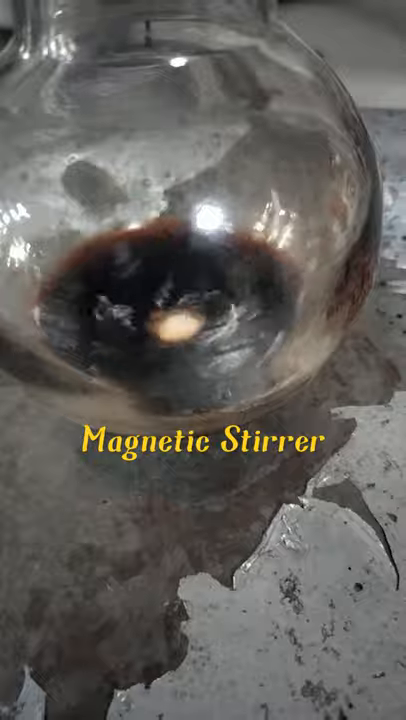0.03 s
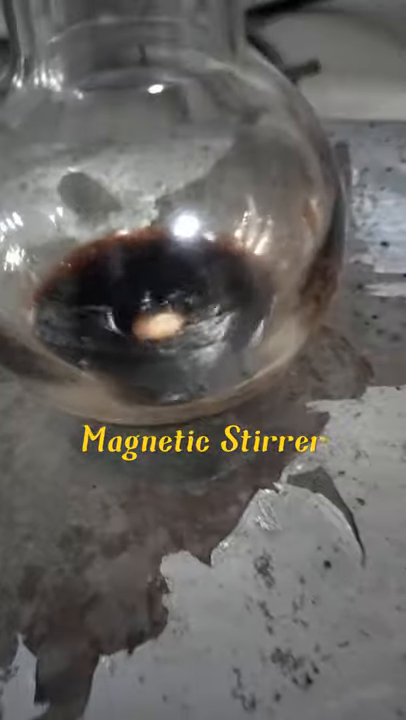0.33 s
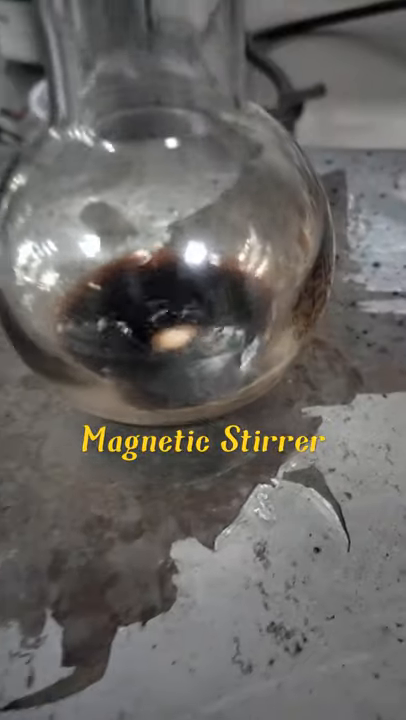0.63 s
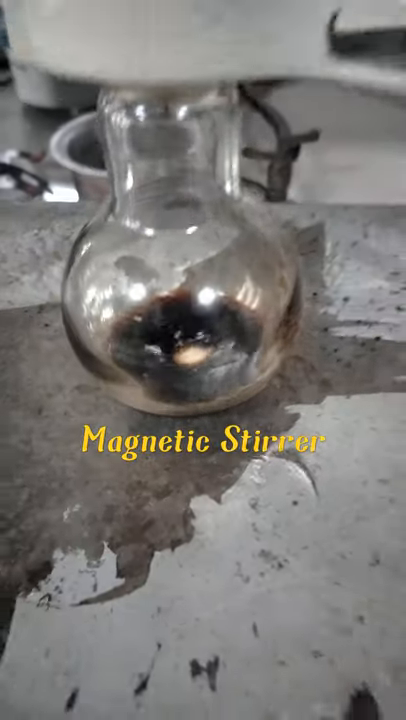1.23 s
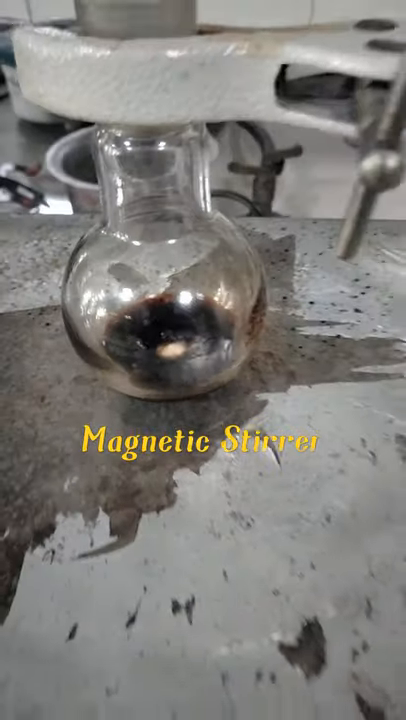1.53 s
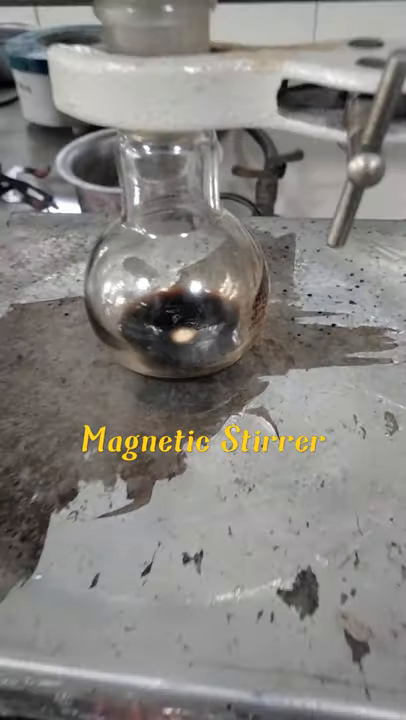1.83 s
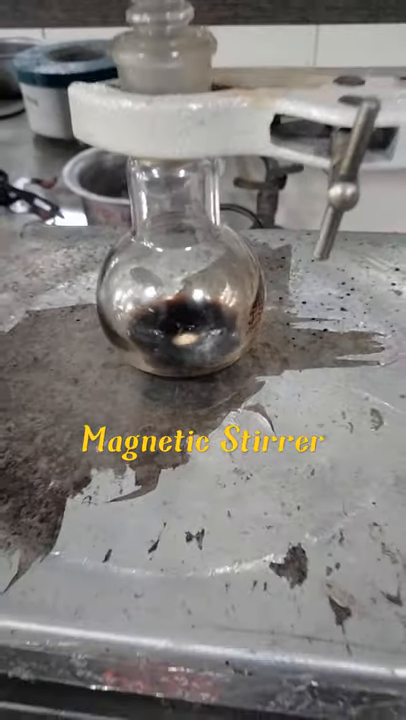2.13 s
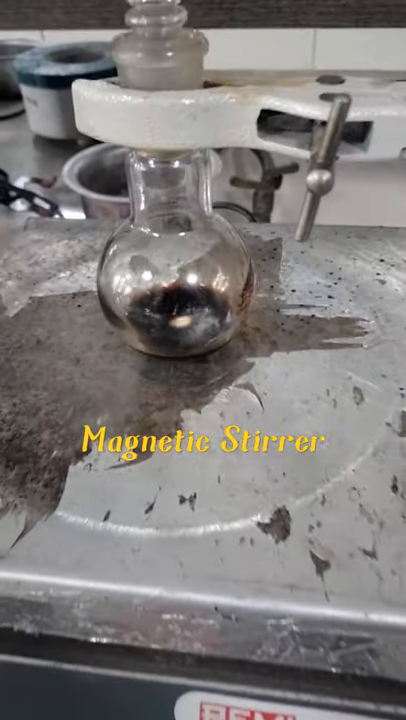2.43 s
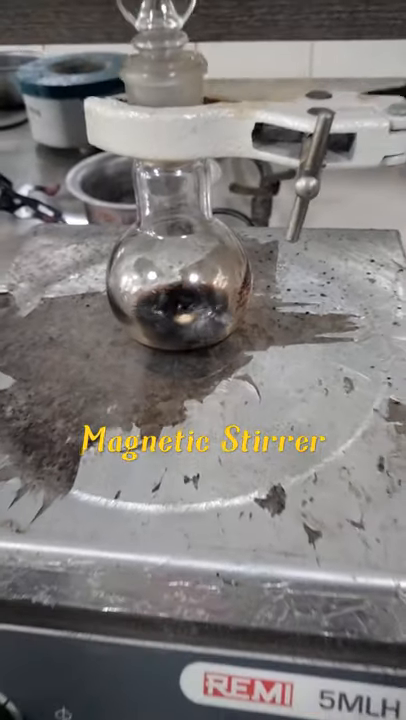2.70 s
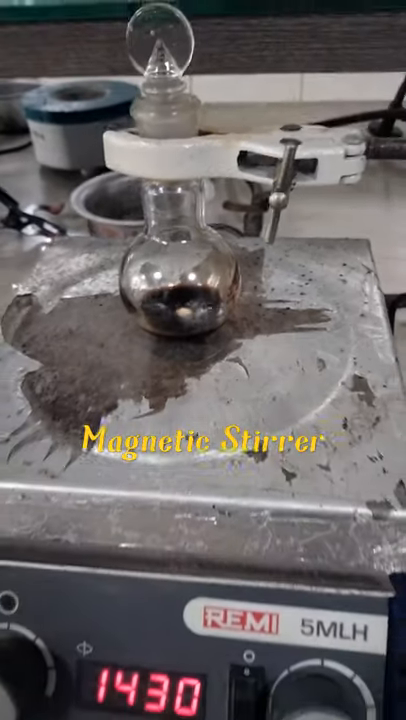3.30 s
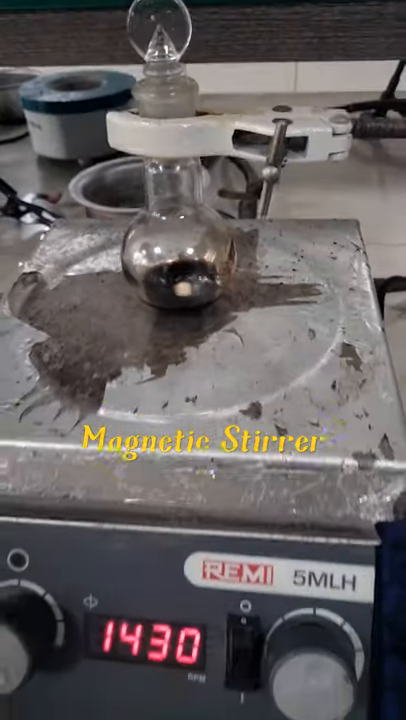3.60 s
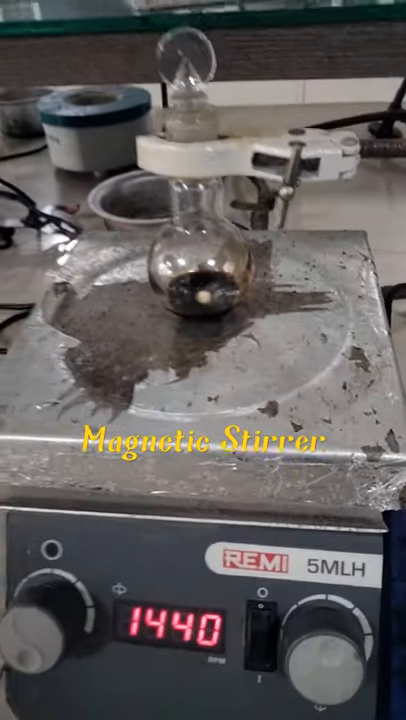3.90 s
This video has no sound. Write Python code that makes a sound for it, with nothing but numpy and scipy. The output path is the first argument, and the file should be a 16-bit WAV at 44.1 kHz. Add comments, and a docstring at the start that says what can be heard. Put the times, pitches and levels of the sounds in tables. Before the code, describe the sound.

A magnetic stirrer hums while its stir bar ticks and rattles in a glass flask.

```python
"""A laboratory bench, where a magnetic stirrer runs as the microphone slowly draws back.
Machines and moving air hum in the room. The stirrer's pulsed motor drive whines and hisses,
swaying with each turn. The wobbling stir bar knocks on the glass flask twice a turn and
rings its liquid-damped modes. The sound fades in at the start."""
import sys
import numpy as np
from scipy import signal
from scipy.fft import rfft, irfft
from scipy.io import wavfile

SR = 44100
rng = np.random.default_rng(int(sys.argv[2]) if len(sys.argv) > 2 else 0)


def output_pcm(signal):
    """Save a mono or channel-first signal as 16-bit PCM at the path in sys.argv[1].

    Samples are clipped to [-1, 1] before scaling.
    """
    pcm = np.clip(np.atleast_2d(signal).T, -1, 1) * 32767
    wavfile.write(sys.argv[1], SR, np.round(pcm).astype(np.int16))


N = 174195
T = np.arange(N) / SR
TURN_HZ, DRIVE_HZ = 23.925, 427.55  # motor turns, drive pulses


def amp(db):
    """Decibels to gain."""
    return 10 ** (np.asarray(db) / 20)


def unit(x):
    """Scales to rms 1."""
    return x / np.sqrt(np.mean(abs(x) ** 2) + 1e-20)


def level(points):
    """Gain envelope through (t/s, level/dB) points."""
    return amp(np.interp(T, *np.transpose(points)))


def colour(x, points):
    """EQs x through (f/Hz, level/dB) points, then scales to rms 1."""
    hz, db = np.transpose(points)
    f = np.fft.rfftfreq(N, 1 / SR)
    return unit(irfft(rfft(x) * amp(np.interp(np.log(f + 1), np.log(hz), db)), N))


def band(centre_hz, width_hz):
    """Noise in one resonance, at rms 1."""
    f = np.fft.rfftfreq(N, 1 / SR)
    return unit(irfft(rfft(rng.standard_normal(N)) / (1 + ((f - centre_hz) / (width_hz / 2)) ** 2), N))


def tone(hz, waver):
    """A sine of rms 1 whose level and phase wander slowly, by a waver of 0 to 1."""
    coarse_t = np.linspace(0, T[-1], 400)
    drift_hz, phase = 2 * rng.standard_normal(24), rng.random(24)
    drift = unit(np.exp(2j * np.pi * (np.outer(coarse_t, drift_hz) + phase)).sum(1))
    wander = unit(np.sqrt(1 - waver ** 2) + waver * np.interp(T, coarse_t, drift))
    return np.sqrt(2) * (wander * np.exp(2j * np.pi * (hz * T + rng.random()))).real


# Motor and mains tones: f/Hz, level/dB, waver/0-1
HUM_TONES = [(53.3, -70.5, 0.7), (83.14, -54, 0), (101, -62, 0.7), (121.2, -76, 0), (127.5, -77.5, 1),
             (165.3, -55.5, 0.29), (195.2, -66, 0.55), (204.9, -62, 0.3), (252, -71.5, 0.16),
             (279.8, -70.5, 0.72), (288.2, -65.5, 0.8), (299.2, -65, 0.18), (307, -70, 0.85),
             (366, -72, 0.8), (407.3, -68, 0.05), (490.6, -69, 1), (498, -70, 0.73), (630.6, -70.5, 1),
             (1202, -75, 0.5), (1473, -78.5, 0.8)]
# Fader ride on the hum: t/s, level/dB
HUM_RIDE = [(.1, -0.5), (.35, 0.5), (.9, 2), (1.3, 2), (2.2, 0), (3.1, 2), (3.95, 0.5)]


def hum():
    """Motors and mains lay down a bed of low, wavering tones."""
    return level(HUM_RIDE) * sum(amp(db) * tone(hz, waver) for hz, db, waver in HUM_TONES)


# Whine partials: multiple of the pulse rate, level/dB
WHINE_PARTIALS = [(1, -73.5), (2, -65.5), (4, -77), (8, -82), (12, -82), (16, -79.5), (20, -87), (21, -85)]
# Upper sidebands the turning motor splits off the third partial: offset/turn rates, level/dB
HOUSING_SIDEBANDS = [(1, -18), (2, -19.5)]
# Ride on the third partial, which the housing amplifies: t/s, level/dB
HOUSING_RIDE = [(.25, -53), (.8, -54.5), (1.4, -56), (2.1, -59.5), (3, -60.5), (3.95, -67)]
# EQ of the pulsed hiss: f/Hz, level/dB
HISS_EQ = [(1500, -9), (2300, 6.5), (3000, -7), (4600, -16), (6100, -8.5), (6850, -7), (7400, -12),
           (8500, 1.5), (9600, -4), (10500, -22), (12000, -9), (12750, -27), (13500, -7), (14400, -17),
           (15500, -2.5)]


def drive(sway_depth=0.14, waver=0.067, rustle_db=-6, hiss_db=-63.5, decay_periods=0.42):
    """The drive's pulses whine and hiss; the housing rings along and each motor turn sways it all."""
    sway = 1 + sway_depth * (np.cos(2 * np.pi * TURN_HZ * T) + np.sin(4 * np.pi * TURN_HZ * T)) / 2
    whine = sum(amp(db) * tone(k * DRIVE_HZ, waver) for k, db in WHINE_PARTIALS)
    third = tone(3 * DRIVE_HZ, waver)
    third += sum(amp(db) * tone(3 * DRIVE_HZ + k * TURN_HZ, waver) for k, db in HOUSING_SIDEBANDS)
    housing = level(HOUSING_RIDE) * (third + amp(rustle_db) * band(centre_hz=1307, width_hz=54))
    puffs = np.exp(-(DRIVE_HZ * T % 1) / decay_periods) * rng.standard_normal(N)
    return sway * (whine + housing + amp(hiss_db) * colour(puffs, HISS_EQ))


# EQ of the room air: f/Hz, level/dB
AIR_EQ = [(15, -70), (24, -2), (38, -15), (65, -13), (110, -6.5), (180, -8), (300, -6), (440, -11),
          (550, -12.5), (700, -11.5), (930, -18.5), (1230, -15.5), (1530, -21), (2350, -28.5),
          (2900, -29.5), (4600, -32), (5850, -36.5), (8300, -23), (10300, -31.5), (15400, -33)]
# Ride on the room air: t/s, level/dB
AIR_RIDE = [(.07, -52), (.3, -52.5), (1.1, -52), (2.2, -52.5), (3.95, -52.5)]
# Swell of the midrange rush: t/s, level/dB
RUSH_SWELL = [(.3, -94), (1.5, -65.5), (2.5, -65), (3.95, -61)]


def air():
    """Moving air makes a steady room tone while a broad midrange rush slowly grows."""
    room_tone = level(AIR_RIDE) * colour(rng.standard_normal(N), AIR_EQ)
    return room_tone + level(RUSH_SWELL) * band(centre_hz=1620, width_hz=1500)


# Wobble accent, added on one turn of the bar and subtracted on the next: t/s, level/dB
WOBBLE_ACCENT = [(.35, 5), (.55, -1), (.95, 1), (1.2, 6.5), (2.15, 3.5), (2.35, -2), (2.6, 5.5), (2.8, 0.5),
                 (3.2, -7), (3.5, -5), (3.95, -1)]
# Hard knocks of the bar: t/s, level/dB
HARD_KNOCKS = [(0.2801, -40), (0.345, -39), (0.366, -42), (0.572, -46), (0.6558, -48), (0.72, -43.5),
               (0.8244, -40.5), (0.9741, -42.5), (1.1841, -42), (1.2828, -42.5), (1.348, -41.5),
               (1.449, -45), (1.6013, -36.5), (1.684, -43), (1.852, -40.5), (1.936, -41.5), (1.9542, -43),
               (2.0177, -42.5), (2.0367, -42), (2.1865, -40.5), (2.2043, -41), (2.2292, -43), (2.331, -40),
               (2.3983, -41), (2.4825, -39.5), (2.6898, -42.5), (2.9158, -43.5), (2.9815, -43),
               (3.1088, -42), (3.1666, -44.5), (3.2294, -42), (3.2506, -41), (3.337, -47), (3.415, -43),
               (3.4794, -42), (3.498, -42.5), (3.563, -41.5), (3.582, -42), (3.665, -45), (3.731, -44),
               (3.7478, -42.5), (3.7737, -38.5), (3.8301, -45), (3.8979, -43)]


def stir_bar(first_s=.0115, jitter_s=.0008, tick_db=-52, spread_db=2, knock_trim_db=-1):
    """Each end of the bar hits the glass once a turn, with a short chatter: one force row per end."""
    chatter_s, chatter_lead_s, chatter_db = .009, .002, -9.5
    knocks = np.array(HARD_KNOCKS) + [0, knock_trim_db]
    grid = np.arange(first_s, T[-1], 1 / (2 * TURN_HZ))
    beat = np.arange(len(grid))
    timing, strength = rng.standard_normal((len(grid), 2)).T
    accent_db = np.interp(grid, *np.transpose(WOBBLE_ACCENT)) * (-1) ** (beat // 2)
    accent_db[::2] = 5 + 0.47 * accent_db[::2]  # the first end taps harder and more evenly
    ticks = np.c_[grid + jitter_s * timing, tick_db + accent_db + spread_db * strength]
    clear = abs(grid[:, None] - knocks[:, 0]).min(1) > .009  # a knock replaces a tick within 9 ms
    force = np.zeros((2, N + SR))
    for s, db in np.vstack([ticks[clear], knocks]):
        end = round((s - first_s) * 2 * TURN_HZ) % 2
        delay, size = rng.random(size=14), rng.standard_normal(size=14)
        chatter_at = ((s - chatter_lead_s + chatter_s * delay) * SR).astype(int)
        force[end, round(s * SR)] += amp(db)
        force[end, chatter_at] += amp(db + chatter_db) * unit(size * (1 - delay / 2))
    return force[:, :N]


# Glass modes of the flask: f/Hz, t60/s, close level/dB, distant level/dB
FLASK_MODES = [(2350, 0.025, -8, -14.5), (3310, 0.004, -25, -27), (3668, 0.033, -12, -18.5),
               (3950, 0.017, -28, -27.5), (5110, 0.024, -19.5, -19), (5280, 0.0066, -12, -7),
               (5510, 0.0082, -25, -21), (6774, 0.026, -6, -14.5), (7370, 0.021, -10, -13),
               (7900, 0.0077, -8, -2.5), (8540, 0.01, -5, 1), (8780, 0.0047, -3, -2.5),
               (9320, .015, -9, -11), (10050, 0.015, -10.5, -14.5), (11470, 0.017, -23, -13),
               (12200, 0.025, -20, -21), (13500, 0.013, -16, -19), (14100, 0.011, -9, -22)]


def flask(forces, draw_back_s=(0.99, 1.6), rub_db=-84.5, crack_hz=(2400, 6300), crack_db=9):
    """Hits and rubbing ring the liquid-damped glass; its colour crossfades from close to distant."""
    t = np.arange(2048) / SR
    hz, t60, close_db, far_db = np.transpose(FLASK_MODES)
    polarity = (-1) ** np.arange(len(hz))[:, None]
    rings = polarity * amp(-60 * t / t60[:, None]) * np.sin(2 * np.pi * hz[:, None] * t)
    scoop_db = 2 - 9.2 * np.exp(-((hz - 4760) / 1800) ** 2)
    away = np.interp(T, draw_back_s, [0, 1])
    glass = 0
    for force, end_db in zip(forces, (-scoop_db, scoop_db)):  # duller end, brighter end
        contact = force + amp(rub_db) * rng.standard_normal(N)
        close, far = (signal.oaconvolve(contact, amp(db + end_db) @ rings)[:N]
                      for db in (close_db, far_db))
        glass += ((1 - away) * close + away * far) / 2
    crack = signal.sosfilt(signal.butter(1, crack_hz, "bandpass", fs=SR, output="sos"), forces.sum(0))
    return glass + amp(crack_db) * crack


def room(x, t60_s=0.067, wet_db=-14.5):
    """Bench and walls add short, diffuse reflections."""
    t = np.arange(SR // 3) / SR
    tail = rng.standard_normal(len(t)) * amp(-60 * t / t60_s)
    return x + amp(wet_db) * signal.oaconvolve(x, tail / np.linalg.norm(tail))[:N]


def scene():
    """Mono mix of hum, drive, air and the ticking flask."""
    return (hum() + drive() + air() + room(flask(stir_bar())))[None]


# Master fade-in: t/s, level/dB
FADE_IN = [(.06, -59), (.072, -19.5), (.1, -13), (.15, -7.5), (.22, -5), (.32, -1)]


def record(dry, cutoff_hz=15560):
    """Fades the mix in and takes off the very top with a steep low-pass."""
    lowpass = signal.firwin(1023, cutoff_hz, window=("kaiser", 9), fs=SR)
    return signal.oaconvolve(dry * level(FADE_IN), lowpass[None], "same")


dry = scene()
out = record(dry)
output_pcm(out)
```